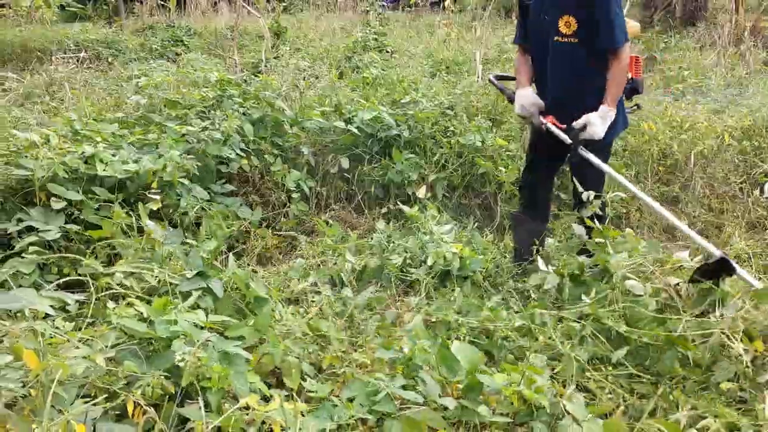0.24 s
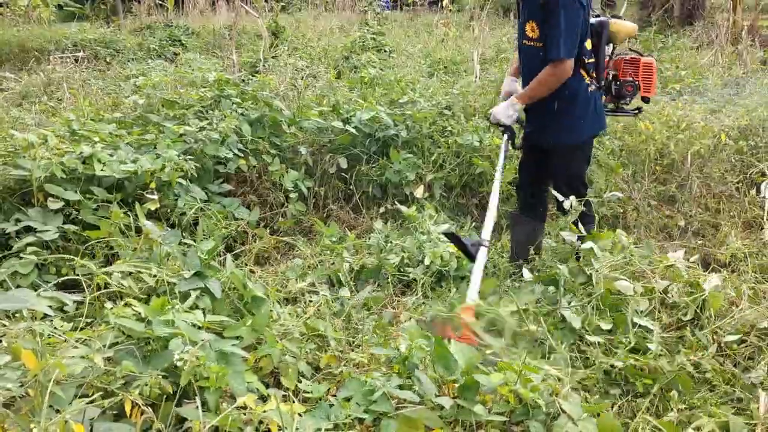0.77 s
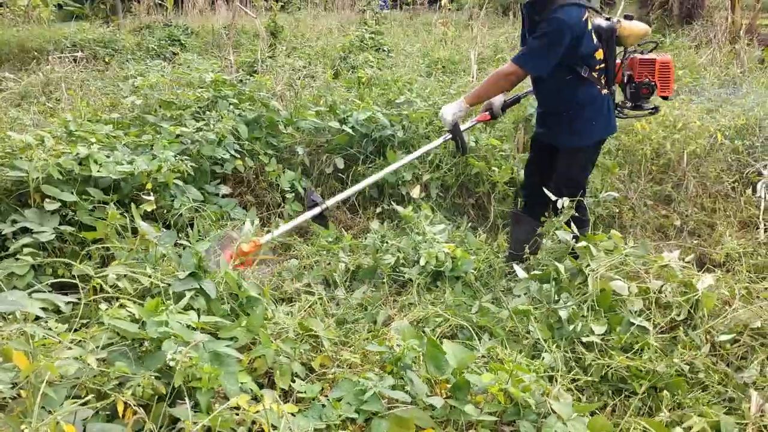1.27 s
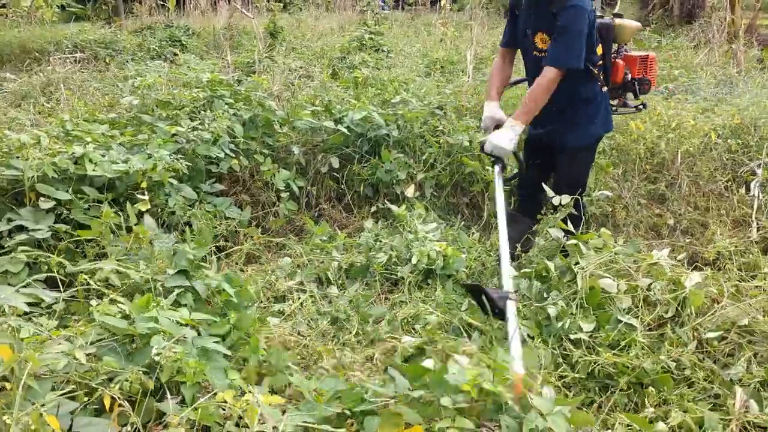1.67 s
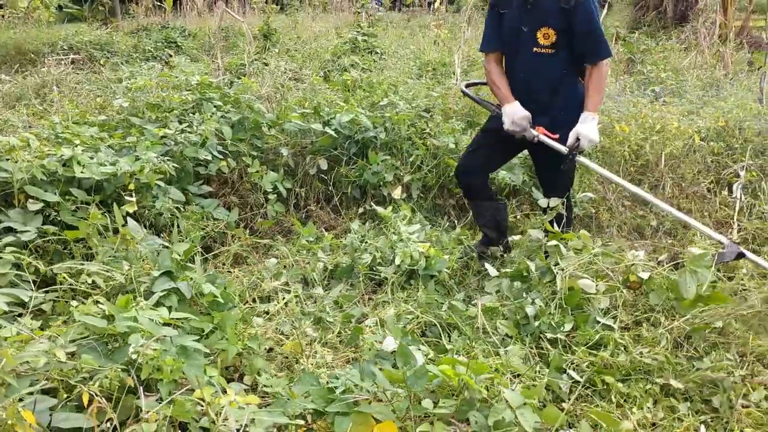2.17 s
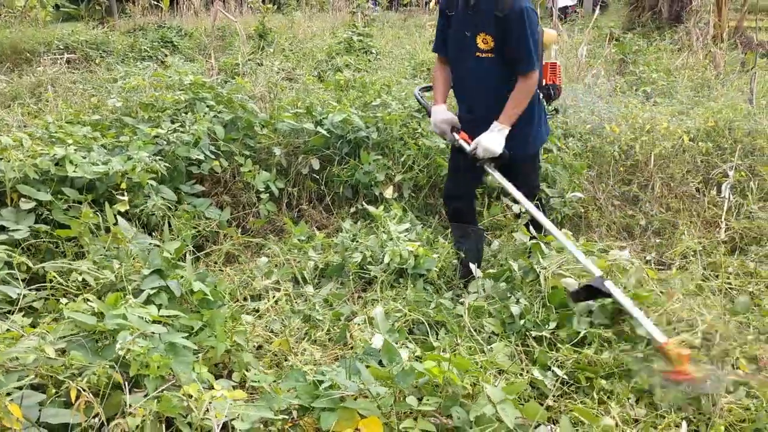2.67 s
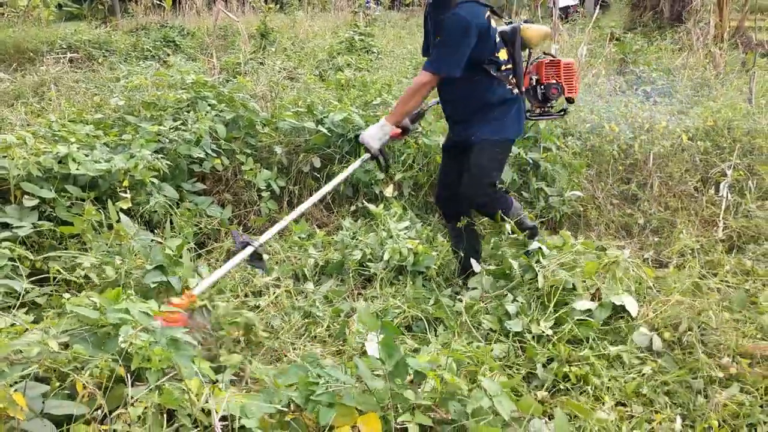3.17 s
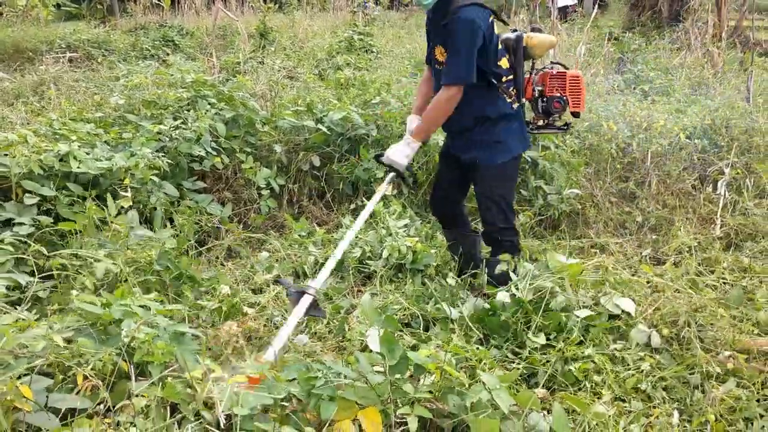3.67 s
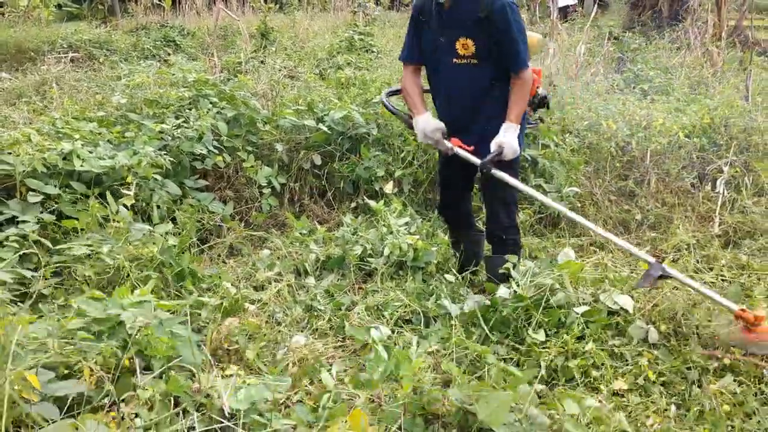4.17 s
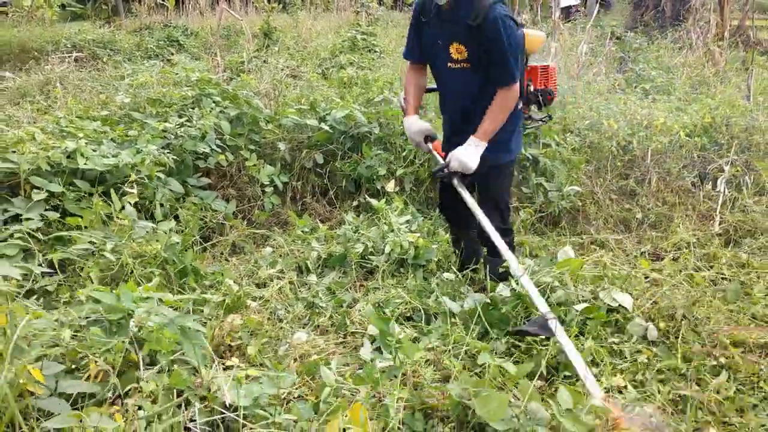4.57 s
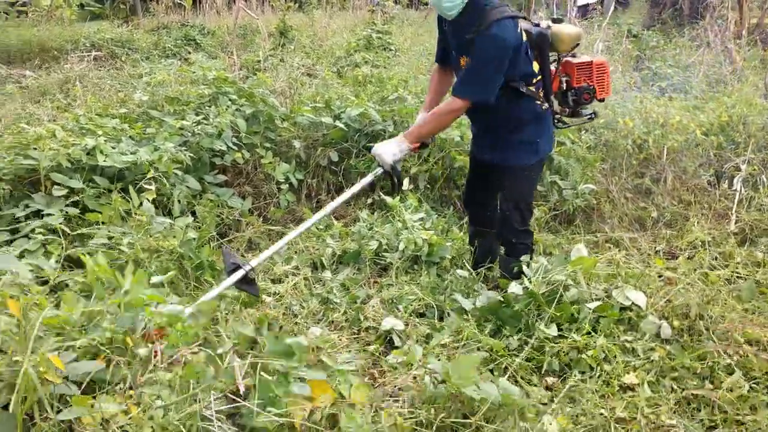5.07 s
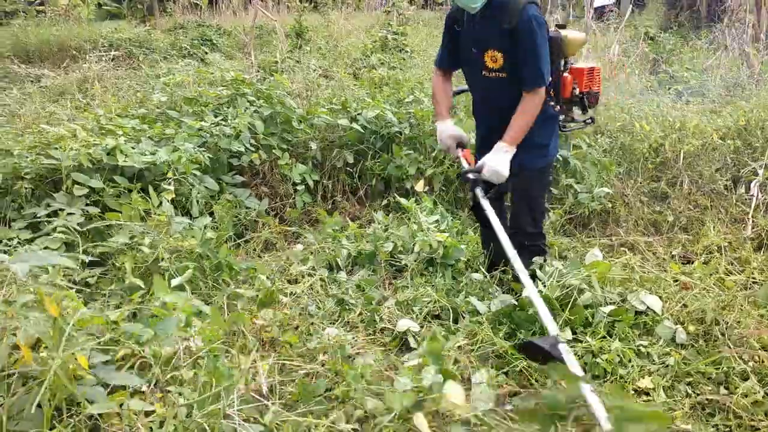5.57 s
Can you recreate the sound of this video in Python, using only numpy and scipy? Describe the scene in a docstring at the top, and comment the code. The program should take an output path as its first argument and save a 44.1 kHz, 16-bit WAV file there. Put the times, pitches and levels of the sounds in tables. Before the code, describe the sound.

A backpack petrol brush cutter runs a few metres away in an open field, its raspy buzz rising and sagging. The blade tears leaves with bright hissing shreds, metallic ringing and sharp stalk snaps. At two seconds a scrap slaps and scrapes the phone microphone, the sound drops out momentarily, then cutting continues much quieter and duller, with thin rising whistles near three seconds and a hard burst of snaps and clangs before five.

```python
"""A two-stroke backpack brush cutter works through dense weeds in an open field, a few metres from a phone.
Engine: waving orders of the firing rate, puffs, port cracks, fan whine and a rush of gas.
Blade: random blows tear leaves, fling scraps and ring turning modes; stalks snap, stems clang, a thin tone rises.
At two seconds a flung scrap hits the microphone: the sound drops out briefly and returns quieter and duller."""
import sys
import numpy as np
from scipy import signal
from scipy.fft import rfft, irfft, next_fast_len
from scipy.io import wavfile
from scipy.ndimage import uniform_filter1d

SR = 44100
rng = np.random.default_rng(int(sys.argv[2]) if len(sys.argv) > 2 else 0)


def dump_mix(stems):
    """Bounce the given channels to the path in sys.argv[1] as a 16-bit WAV at rate SR."""
    frames = np.atleast_2d(stems).T  # one column per channel
    limited = np.clip(frames, -1, 1)  # hard clip at full scale
    pcm = np.round(limited * 32767).astype(np.int16)
    wavfile.write(sys.argv[1], SR, pcm)


N = 257544
T = np.arange(N) / SR
HZ = np.fft.rfftfreq(N, 1 / SR)


def amp(db):
    """Decibels to gain."""
    return 10 ** (np.asarray(db) / 20)


def unit(x):
    """Scales to rms 1."""
    return x / np.sqrt(np.mean(x ** 2) + 1e-20)


def unit_in(x, band_hz):
    """Scales so that the rms inside a band is 1."""
    inside = rfft(x)[(HZ > band_hz[0]) & (HZ < band_hz[1])]
    return x * N / np.sqrt(2 * np.sum(abs(inside) ** 2))


def curves(table):
    """Each column after the time, interpolated to one value a sample."""
    s, *columns = np.transpose(table)
    return [np.interp(T, s, c) for c in columns]


def colour(x, points):
    """Filters by a spectrum drawn on a log-frequency axis."""
    hz, db = np.transpose(points)
    size = next_fast_len(N + SR // 4)  # padding keeps the tail from wrapping round
    log_hz = np.log(np.fft.rfftfreq(size, 1 / SR) + 1)
    gain = amp(np.interp(log_hz, np.log(hz), db))
    return irfft(rfft(x, size) * gain, size)[..., :N]


def drift(hz):
    """Smooth random curve of rms about 1, up to about hz changes a second."""
    size = N // 64 + 2
    f = np.fft.rfftfreq(size, 64 / SR)
    slow = irfft(rfft(rng.standard_normal(size)) * np.exp(-(f / hz) ** 2), size)
    return np.interp(T, np.linspace(0, T[-1], size), unit(slow))


def crackle(per_s, spread_db):
    """Random clicks of overall rms 1; positive spread: a few larger, negative: a few smaller."""
    size = amp(spread_db * np.minimum(rng.exponential(1, N), 4))
    sign = rng.choice([-1, 1], N)
    present = rng.random(N) < per_s / SR
    return unit(size * sign * present)


def burst(start_s, decay_s):
    """A sudden rise at start_s that dies away exponentially."""
    age_s = np.maximum(T - start_s, 0)
    return (1 - np.exp(-age_s / .001)) * np.exp(-age_s / decay_s)


# Engine speed, sagging under load. Each row: time in seconds, mean firing rate in Hz.
SPEED = [(0.0, 102.4), (0.24, 109.1), (0.44, 107.8), (0.6, 118.4), (0.81, 115.9), (0.94, 119.9),
         (1.2, 122.0), (1.4, 126.4), (1.67, 124.5), (1.84, 109.5), (2.02, 114.2), (2.13, 102.5),
         (2.32, 111.9), (2.49, 112.7), (2.75, 122.7), (2.96, 117.9), (3.14, 125.6), (3.32, 120.9),
         (3.46, 123.6), (3.63, 120.3), (3.89, 121.9), (4.06, 111.9), (4.26, 121.4), (4.46, 123.1),
         (4.63, 130.0), (4.77, 129.5), (5.04, 117.2), (5.17, 120.1), (5.41, 116.0), (5.84, 104.3)]


def firing_turns(jitter=0.00387):
    """Firings so far: the integral of the firing rate with a slight random jitter."""
    speed_hz, = curves(SPEED)
    return np.cumsum(speed_hz * (1 + jitter * drift(29.8))) / SR


def orders(angle, levels, waver_db, wander_rad=0.59, scatter=1):
    """Multiples of the firing rate, wavering in level and phase; little scatter sums to a sharp pulse."""
    total = np.zeros(N)
    for k, db in levels:
        phase = k * angle + 2 * np.pi * scatter * rng.random() + wander_rad * drift(1.4)
        total += amp(db + waver_db * drift(5.5)) * np.cos(phase)
    return np.sqrt(2) * total


# What the muffler lets out. Each row: frequency in Hz, gain in relative dB.
MUFFLER = [(60, -52.5), (200, -32), (420, -17), (550, -3.5), (650, -3), (750, 1), (860, -6.5), (960, -7),
           (1080, -10.5), (1300, -15), (1650, -20), (2000, -17), (2600, -20.5), (3700, -41), (8000, -82)]


def muffler_buzz(turns, angle, pipe_db=-0.4, rasp_db=-15, odd_order_db=-4):
    """Upper orders swell as the speed carries them through the muffler's resonances; each firing puffs."""
    speed_hz, = curves(SPEED)
    levels = []
    for k in range(4, 29):
        if k != 6:  # the tailpipe note is the sixth
            gain_db = np.interp(k * speed_hz, *np.transpose(MUFFLER))
            levels.append((k, gain_db + odd_order_db * (k % 2)))
    pipe = orders(angle, levels, waver_db=1.96, scatter=0.47)
    puffs = rng.standard_normal(N) * np.exp(-(turns % 1) / 0.18)
    return amp(pipe_db) * pipe + amp(rasp_db) * unit(colour(puffs, MUFFLER))


# Exhaust gas and cooling fan noise. Each row: frequency in Hz, spectral density in relative dB.
RUSH = [(25, -15.5), (60, -15), (100, -6.5), (180, -11), (280, -3.5), (480, -1.5), (750, 3), (1100, 0),
        (1500, 4), (1800, -6.5), (2400, -5), (4000, -7.5), (7000, -59)]
# Low and high edge in Hz of the band that sets the rush level.
RUSH_BAND_HZ = (1000, 1700)


def gas_rush(angle, throb=0.2):
    """Turbulent noise throbbing once per firing."""
    noise = rng.standard_normal(N) * (1 + throb * np.cos(angle))
    return unit_in(colour(noise, RUSH), RUSH_BAND_HZ)


# Cooling fan tones. Each row: multiple of the firing rate, level in relative dB.
WHINES = [(12, -2), (13, -4.5), (15, -13), (18, -12), (20, -15), (22, -14), (23, -15)]


def fan_whine(angle):
    """Fan tones locked to the engine, wavering and fluttering."""
    return orders(angle, WHINES, waver_db=3.5) * (1 + 0.292 * drift(35))


# Levels as the worker turns the exhaust to and fro, before trims. Each row: time in seconds, then firing hum,
# third order, sixth order, exhaust buzz, fan whine and rush of gas in dB.
ENGINE = [(0, -37, -45.5, -43, -35, -56, -41), (0.2, -33.5, -46.5, -42.5, -42, -44.5, -47),
          (0.38, -30, -40.5, -38, -36.5, -42, -46), (0.53, -30, -53, -39.5, -36.5, -41, -48),
          (0.66, -31.5, -43.5, -38, -38.5, -41.5, -44.5), (0.8, -32.5, -51, -38, -37, -35.5, -44.5),
          (1.0, -29.5, -41, -39.5, -37, -44, -43), (1.2, -43, -41, -40.5, -36.5, -42.5, -42.5),
          (1.42, -37.5, -40.5, -36.5, -35, -65, -41.5), (1.55, -42.0, -46.5, -52, -39, -65, -38),
          (1.8, -48, -42.5, -54, -40, -54, -41.5), (1.97, -36, -45.5, -48, -41, -49, -44),
          (2.15, -42.5, -43.5, -40, -36, -59, -39.5), (2.38, -36.5, -46, -37.5, -38.5, -51, -43),
          (2.6, -43.5, -46, -41.5, -39, -46.5, -48), (2.75, -50.5, -43, -40.5, -46, -48, -49.5),
          (2.9, -49.5, -45, -42.5, -41.5, -47, -44), (3.1, -44, -43, -37.5, -38, -45, -42.5),
          (3.35, -46, -41, -41.5, -41, -61, -44.5), (3.5, -49, -50.5, -57, -43.5, -60, -41.5),
          (3.7, -45, -45.5, -44.5, -45, -52, -47), (3.92, -44, -46.5, -49.5, -47.5, -48, -50),
          (4.15, -45, -45.5, -43, -43, -47.5, -50), (4.35, -26.5, -37, -32.5, -34.5, -48.5, -36.5),
          (4.55, -31, -33, -26, -26.5, -35, -38), (4.7, -36.5, -40, -33, -34, -60, -31.5),
          (4.88, -37, -37, -34.5, -32, -42, -40.5), (5.08, -62.5, -49, -60, -55, -48.5, -44.5),
          (5.25, -60, -46.5, -54, -47, -50, -45), (5.55, -62, -51, -46.5, -44.5, -43, -41),
          (5.68, -60, -47, -45, -39, -47, -44), (5.79, -37.5, -44.5, -49, -39, -57, -40.5)]


def engine(turns, rush_db=-0.5, second_db=-6.5, uneven=0.095, rough=0.13):
    """Low exhaust orders on the firing rate, plus muffler buzz, fan whine and throbbing gas."""
    hum_db, third_db, sixth_db, buzz_db, fan_db, gas_db = curves(ENGINE)
    angle = 2 * np.pi * turns
    hum = amp(hum_db + .8 * drift(12)) * np.cos(angle)
    third = amp(third_db + 1.5 * drift(12)) * np.sin(3 * angle)
    # no two firings are equally strong
    low = np.sqrt(2) * (hum + third) * (1 + uneven * drift(72))
    # the sixth order sits on the tailpipe's resonance and sings cleanly
    note = np.sqrt(2) * amp(sixth_db + .5) * np.cos(6 * angle) * (1 + rough * drift(50))
    buzz = amp(buzz_db) * muffler_buzz(turns, angle) * (1 + rough * drift(63))
    # the second order is unsteady and follows both hum and gas flow
    second_level = amp((hum_db + gas_db) / 2 + second_db + 3.6 * drift(4.7))
    second = second_level * (1 + 0.34 * drift(15)) * np.cos(2 * angle)
    gas = amp(gas_db + rush_db) * gas_rush(angle)
    return low + note + buzz + second + gas + amp(fan_db) * fan_whine(angle)


# Crack of the exhaust port. Each row: frequency in Hz, gain in relative dB.
CRACK = [(100, -58.5), (900, -21), (1450, 3), (2200, -19), (3000, -2), (3800, -9.5), (5200, -4.5),
         (6800, -12), (7800, -49.5)]


def exhaust_cracks(turns, crack_db=-7, uneven=0.26):
    """The port opens with one sharp crack per firing; its level follows the fan whine."""
    fan_db = curves(ENGINE)[4]
    pulses = np.exp(-((turns % 1 - .5) / .006) ** 2)
    return amp(fan_db + crack_db) * unit(colour(pulses * (1 + uneven * drift(70)), CRACK))


def bite(start_s, length_s, attack_share=0.24, release_s=0.066):
    """The blade enters a clump, stays in it and comes free: exponential rise and fall."""
    rise = 1 - np.exp(-np.maximum(T - start_s, 0) / (attack_share * length_s))
    return rise * np.exp(-np.maximum(T - start_s - length_s, 0) / release_s)


# Turning points of the swing in seconds, alternately left and right, first on the left.
TURNS_S = [-.5, .44, 1.3, 2.52, 3.5, 4.28, 5.2, 6.2]
# Bites into clumps, before trims. Each row: start in seconds, length in seconds, shredding in dB,
# ring of the blade in dB, spray in dB.
BITES = [(-.02, .12, -31, -44, -33.5), (0.109, 0.2, -34.5, -39.5, -38.5), (0.284, 0.33, -39.5, -40.5, -42),
         (0.572, 0.39, -30.5, -38, -33), (0.908, 0.06, -32, -37, -45), (1.345, 0.25, -62, -58, -33.5),
         (1.55, 0.19, -35.5, -40, -29.5), (1.732, 0.14, -29.5, -41, -33.5), (1.951, 0.16, -38, -42, -45.5),
         (2.145, 0.029, -40.5, -32.5, -56.5), (2.772, 0.36, -39.5, -37, -58),
         (3.046, 0.046, -30, -31.5, -50), (3.218, 0.11, -38, -46, -34), (3.367, 0.015, -45, -35, -46),
         (3.652, 0.031, -63, -38, -46), (3.816, 0.25, -35, -41, -38.5), (3.925, 0.027, -41, -33.5, -48),
         (4.272, 0.18, -39.5, -38.5, -46), (4.541, 0.17, -34, -29.5, -41),
         (4.677, 0.036, -27.5, -29, -48.5), (4.786, 0.18, -27, -28, -32), (4.875, 0.021, -46, -29, -50),
         (4.925, 0.011, -48, -32.5, -51), (5.283, 0.15, -46, -34.5, -37), (5.52, 0.095, -37.5, -34.5, -38),
         (5.645, 0.1, -35, -52, -38)]


def blade_work(ring_waver_db=1.6):
    """Gains of shredding, ring and spray: brushing that follows the swing, plus bites, summed as power."""
    swing = np.pi * np.interp(T, TURNS_S, np.arange(len(TURNS_S)))
    left, pace = np.cos(swing), np.sqrt(abs(np.sin(swing)))
    brush_db = -48.5 + 4.5 * pace + 0.5 * left
    brush_spray_db = -48 + 9 * pace + 6 * left  # the standing weeds are on the left
    power = amp([brush_db, brush_db, brush_spray_db]) ** 2
    for start_s, length_s, shred_db, ring_db, spray_db in BITES:
        gains = amp([shred_db, ring_db, spray_db])
        power = power + np.outer(gains, bite(start_s, length_s)) ** 2
    shred, ring, spray = np.sqrt(power)
    return shred, ring * amp(ring_waver_db * drift(14)), spray


# How well the blade radiates. Each row: frequency in Hz, gain in relative dB.
RADIATION = [(200, -26.5), (1500, -3.5), (6500, -2), (8000, -20)]


def blade_ring(blows, modes, spin, tilt_db=1.0, steady_s=0.09):
    """Each mode turns with the blade: a pair of tones, lobes x spin rate above and below its pitch."""
    out = np.zeros(N)
    for hz, lobes, width_hz, db, upper_db in modes:
        pole = np.exp((2j * np.pi * hz - np.pi * width_hz) / SR)
        ring = signal.lfilter([1], [1, -pole], blows + 1e-18)
        # dense blows keep the ring fed: it flutters, but holds its level
        power = abs(uniform_filter1d(abs(ring) ** 2, round(steady_s * SR)))
        ring = ring / np.sqrt(power + 1e-12)
        turn = np.exp(2j * np.pi * (lobes * spin + rng.random()))
        pair = (ring * (turn.conj() + amp(upper_db) * turn)).real
        # modes swell and fade as the blade tilts
        out += amp(db + tilt_db * drift(3.1)) * unit(pair)
    return unit(colour(out, RADIATION))


# Tearing leaves. Each row: frequency in Hz, spectral density in relative dB.
SHRED = [(800, -36.5), (1700, 0), (2300, -13.5), (2800, 0), (3300, -3.5), (4000, -1.5), (4700, 7.5),
         (5200, 5.5), (5700, -5), (6500, -34), (8000, -69.5), (12000, -68.5)]
# Fine scraps flying through the leaves. Each row: frequency in Hz, spectral density in relative dB.
SPRAY = [(3000, -16), (4600, -10), (5400, 3.5), (6300, 10), (6900, 6), (7350, -2.5), (7800, -43.5),
         (9000, -38.5), (10300, -25), (12000, -41), (15500, -36.5)]
# Blade modes, low and high. Each row: pitch at rest in Hz, lobes round the rim, width in Hz,
# level in relative dB when brushed, upper tone of the pair in dB re the lower.
LOW_MODES = [(1932, 1, 20, 0, 0), (1990, 2, 40, -11, 4)]
HIGH_MODES = [(2372, 1, 14, -7, 3), (2465, 1, 12, -9, 3), (3236, 2, 7, -2, -7), (3590, 2, 4, -11, -5),
              (3775, 2, 5, -9, -1), (3964, 2, 6, -7, 2), (4330, 2, 8, -6, 4), (4760, 2, 12, 1, 0),
              (4850, 2, 14, -5, 0), (5285, 2, 14, -7, -1), (5455, 2, 14, -8, -1), (6010, 2, 20, -4, 1)]


def cutting(spin, shred_db=-3, low_ring_db=-0.5, high_ring_db=-3.5, spray_db=-3.0, clump_db=1.4):
    """Leaves and stems tear in clumps; the same blows set the blade ringing."""
    shred, ring, spray = blade_work()
    clumps = unit(amp(clump_db * drift(180)))
    blows = clumps * crackle(per_s=7700, spread_db=-1.0)
    tear = unit_in(colour(blows, SHRED), (2500, 5300))
    flecks = clumps * crackle(per_s=10000, spread_db=1.0)
    scraps = unit_in(colour(flecks, SPRAY), (5600, 7000))
    low_ring = amp(low_ring_db) * blade_ring(blows, LOW_MODES, spin, tilt_db=-0.5)
    high_ring = amp(high_ring_db) * blade_ring(blows, HIGH_MODES, spin)
    # the high ring follows the shredding, the low ring its own gain
    return shred * (amp(shred_db) * tear + high_ring) + ring * low_ring + spray * amp(spray_db) * scraps


# Stalks snapping on the blade. Each row: start in seconds, level in dB before trims,
# decay in seconds, thickness from 0 to 1.
SNAPS = [(.026, -18, .002, 0), (.033, -18, 0.0054, 0), (0.091, -32, 0.0017, 0.16),
         (0.529, -20, 0.0054, 0.2), (.535, -25.5, 0.028, 0.47), (0.554, -23.5, 0.015, 0.66),
         (0.949, -21, 0.0062, 0.3), (1.569, -24, 0.0027, 0), (1.834, -17, .003, 0.05),
         (1.976, -21, 0.013, 0.16), (1.993, -18, 0.012, 0.4), (2.313, -31, 0.022, 0.4),
         (3.089, -39.5, .012, 0.24), (3.312, -22, 0.0019, .1), (4.667, -17, 0.033, 1),
         (4.702, -18, 0.0099, 0.8), (4.786, -15.5, 0.009, 0.55), (4.807, -15.5, 0.033, 0.62),
         (4.929, -15, 0.0035, 0.32), (5.557, -25, 0.0062, 0.1)]
# Softer, darker blow of a thick stalk. Each row: frequency in Hz, gain in relative dB.
THICK = [(500, -14), (1500, 5.5), (2400, 9.5), (3100, 2), (3500, 11), (3900, -5), (4500, 1), (5500, -17.5),
         (7000, -33), (8000, -49)]


def stalks(crack_db=3, spray_db=-5, thick_db=-5):
    """Grainy bursts: thin stalks crack brightly, thick ones knock."""
    grain = crackle(per_s=12000, spread_db=1.5)
    thin, thick = np.zeros(N), np.zeros(N)
    for start_s, db, decay_s, thickness in SNAPS:
        snap = amp(db) * grain * burst(start_s, decay_s)
        thin += (1 - thickness) * snap
        thick += thickness * snap
    bright = amp(crack_db) * colour(thin, SHRED) + amp(spray_db) * colour(thin, SPRAY)
    return bright + amp(thick_db) * colour(thick, THICK)


# Woody stems that set the blade ringing. Each row: start in seconds, level in dB, pitch rung most in Hz.
CLANGS = [(.533, -29.5, 4770), (.544, -24.5, 3390), (.938, -36, 3050), (0.948, -27, 4670),
          (3.04, -35, 3150), (4.668, -24, 3280), (4.702, -29, 4440), (4.79, -28, 3950), (4.858, -26, 3200)]


def clangs(spin, reach_hz=240, rise_s=0.0025):
    """A woody stem strikes the blade; modes near one pitch ring on, each as its pair of tones."""
    out = np.zeros(N)
    for start_s, db, centre_hz in CLANGS:
        span = (T >= start_s) & (T < start_s + .5)
        age_s, turning = T[span] - start_s, 2 * np.pi * spin[span]
        for hz, lobes, width_hz, _, upper_db in HIGH_MODES:
            size = amp(db) / (1 + ((hz - centre_hz) / reach_hz) ** 2)
            phase = 2 * np.pi * (hz * age_s + rng.random())
            pair = np.cos(phase - lobes * turning) + amp(upper_db) * np.cos(phase + lobes * turning)
            envelope = (1 - np.exp(-age_s / rise_s)) * np.exp(-np.pi * width_hz * age_s)
            out[span] += size * envelope * pair
    return out


HIT_S, MUTE_S, BACK_S = 2.003, 2.0415, 2.064
# Scrap slapping the phone. Each row: frequency in Hz, spectral density in relative dB.
KNOCK = [(50, -42), (80, -11), (120, 9.5), (210, 4), (300, -21), (600, 2.5), (950, 7), (1500, 5),
         (2000, -8.5), (2400, 5), (3500, -10), (5200, -10), (7000, -15.5), (9000, -25.5), (15000, -31.5)]
# Scrap scraping over the phone. Each row: frequency in Hz, spectral density in relative dB.
SCRAPE = [(60, -34.5), (300, 1), (1200, 8.5), (3500, -5), (5300, 6.5), (7500, -5), (9500, -9), (11000, 1.5),
          (13000, -9.5), (15500, -7.5)]


def scrap_hit(knock_db=-19, scrape_db=-24, knock_decay_s=0.082, scrape_delay_s=0.01,
              scrape_decay_s=0.065, right_db=-5):
    """A scrap slaps the phone, nearer the left port, then scrapes over it: noise, then grains."""
    knock = unit(colour(rng.standard_normal((2, N)), KNOCK)) * burst(HIT_S, knock_decay_s)
    knock = knock * amp([[0], [right_db]])
    grain = crackle(per_s=9000, spread_db=2)
    scrape = unit(colour(grain, SCRAPE)) * burst(HIT_S + scrape_delay_s, scrape_decay_s)
    return (amp(knock_db) * knock + amp(scrape_db) * scrape) * (T < BACK_S - .01)


# Thin whistles as the blade sweeps left. Each row: start in seconds, length in seconds,
# first pitch in Hz, last pitch in Hz, peak level in dB before flutter.
WHISTLES = [(2.76, .28, 3860, 4150, -47.5), (2.77, .16, 3540, 3700, -50), (3.12, .29, 3930, 4170, -45.5),
            (3.13, .19, 3560, 3760, -49)]


def whistle(flutter=0.6):
    """A fluttering tone swells and fades as it rises."""
    out = np.zeros(N)
    for start_s, length_s, first_hz, last_hz, db in WHISTLES:
        part = np.clip((T - start_s) / length_s, 0, 1)
        pitch_hz = first_hz + (last_hz - first_hz) * part
        out += amp(db) * np.sin(np.pi * part) * np.cos(2 * np.pi * np.cumsum(pitch_hz) / SR)
    return out * (1 + flutter * drift(40))


def scene(blade_turns_per_firing=.765):
    """The machine straight ahead in open air, with no echo; only the scrap's slap differs between sides."""
    turns = firing_turns()
    spin = blade_turns_per_firing * turns
    machine = engine(turns) + exhaust_cracks(turns)
    blade = cutting(spin) + stalks() + clangs(spin) + whistle()
    return machine + blade + scrap_hit()


# Tone of the soiled microphone. Each row: frequency in Hz, gain in dB before the overall drop.
SOILED = [(100, 3.5), (150, 5.5), (240, -4), (340, 1.5), (1400, -3.5), (3000, 1.5), (4200, 4.5), (5600, -2),
          (6300, -9), (6700, -14.5), (6900, -23.5), (7100, -59), (8000, -47)]


def record(dry, mute_db=-30, soiled_db=-10, edge_hz=15750):
    """The hit mutes the microphone for a moment and leaves it quiet and dull; then the band limit."""
    clear = np.where(T < MUTE_S, 1, amp(mute_db) * (T < BACK_S))
    soiled = np.clip((T - BACK_S) / 0.01 + .5, 0, 1)
    heard = clear * dry + soiled * amp(soiled_db) * colour(dry, SOILED)
    lowpass = signal.firwin(511, edge_hz, window=("kaiser", 9), fs=SR)
    return signal.oaconvolve(heard, lowpass[None], "same")


dry = scene()
out = record(dry)
dump_mix(out)
```